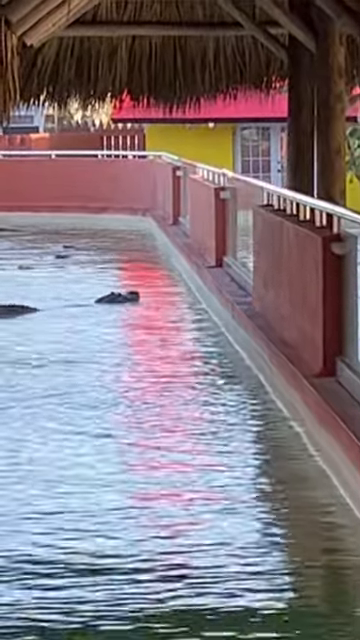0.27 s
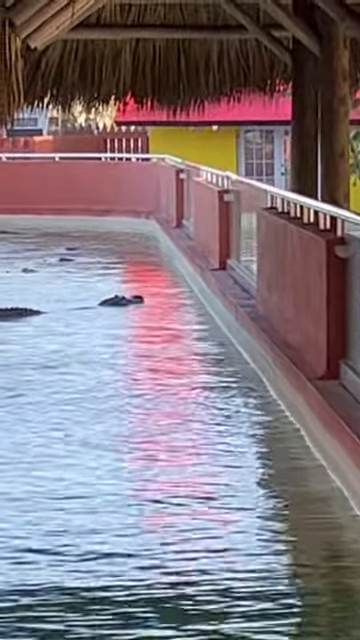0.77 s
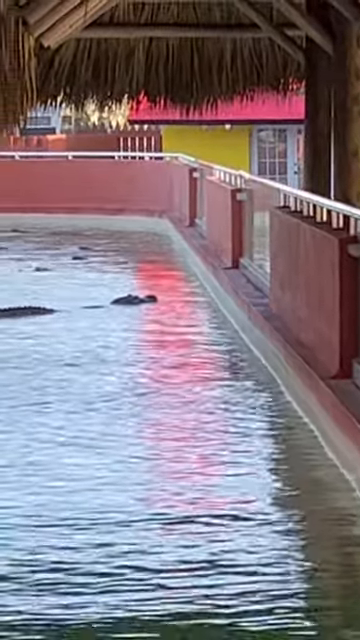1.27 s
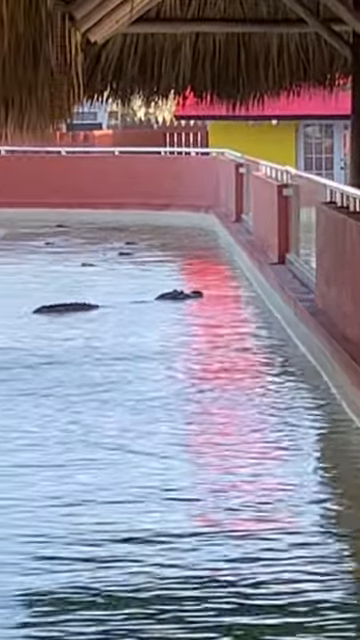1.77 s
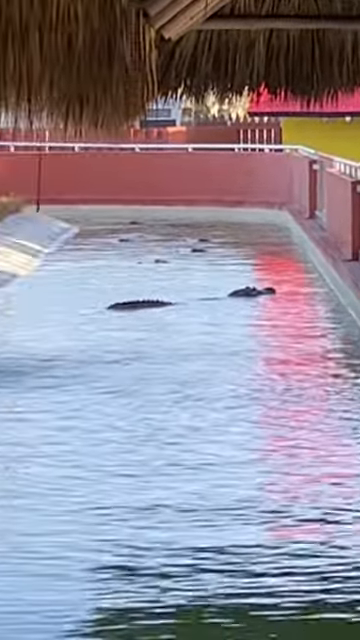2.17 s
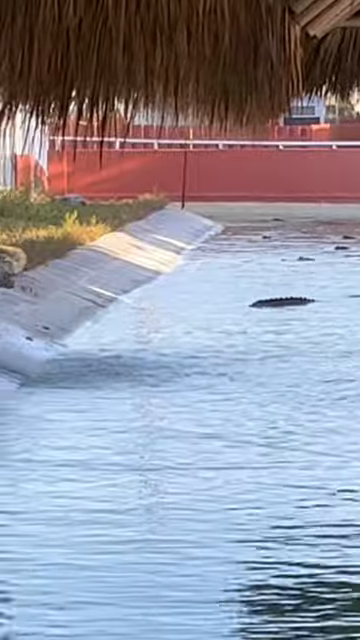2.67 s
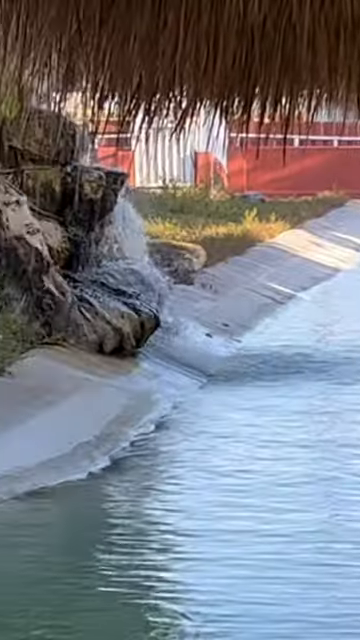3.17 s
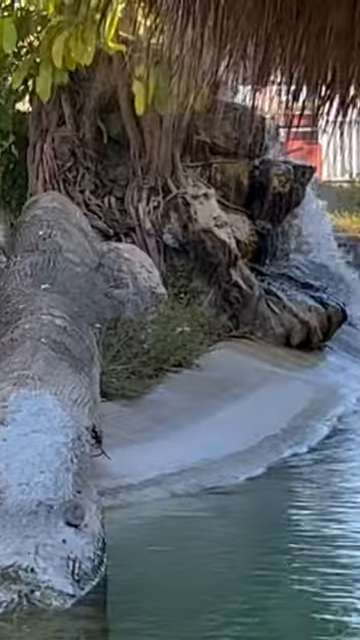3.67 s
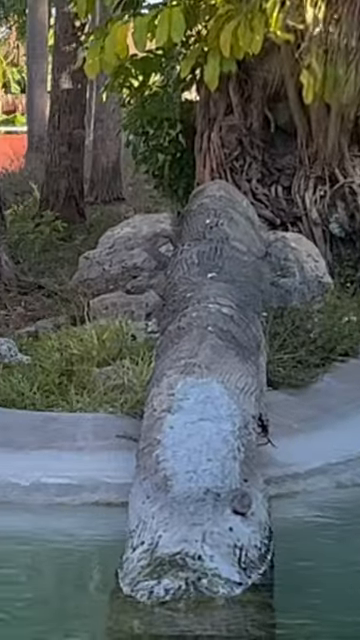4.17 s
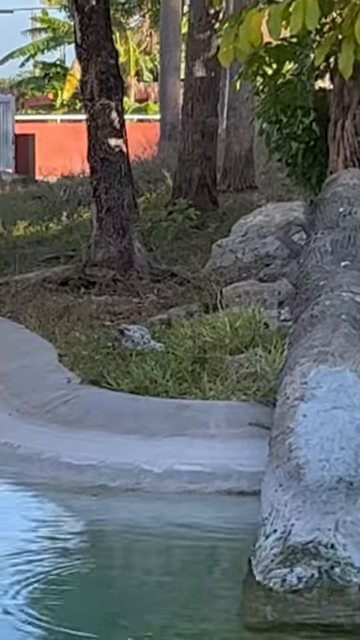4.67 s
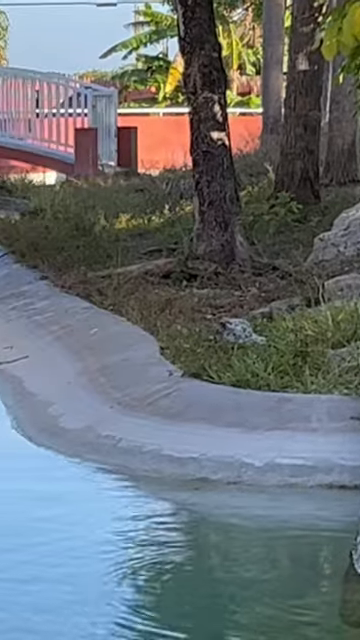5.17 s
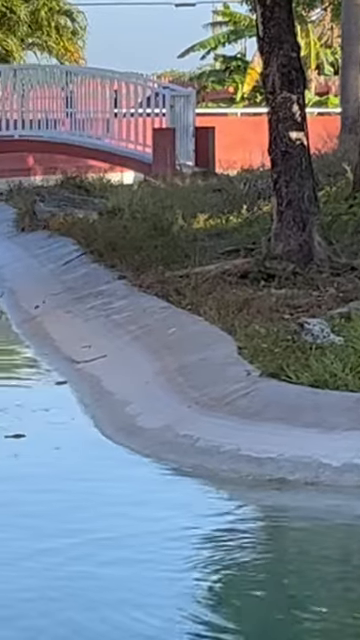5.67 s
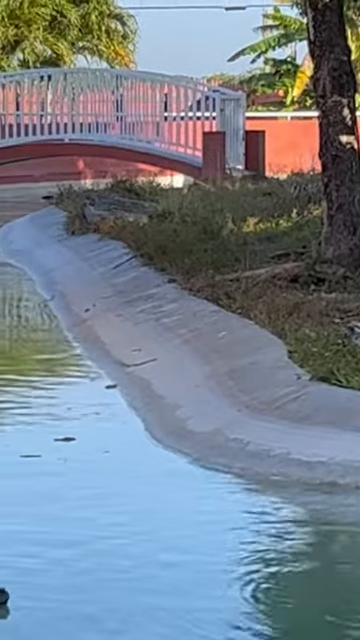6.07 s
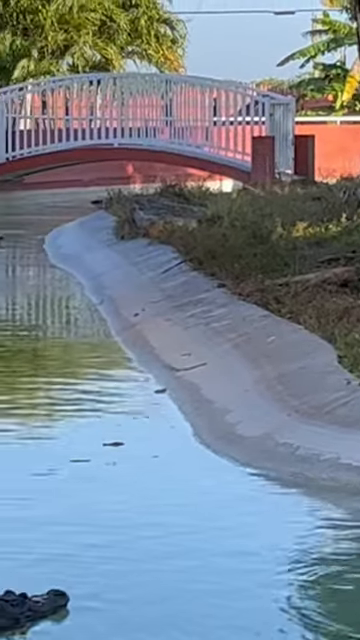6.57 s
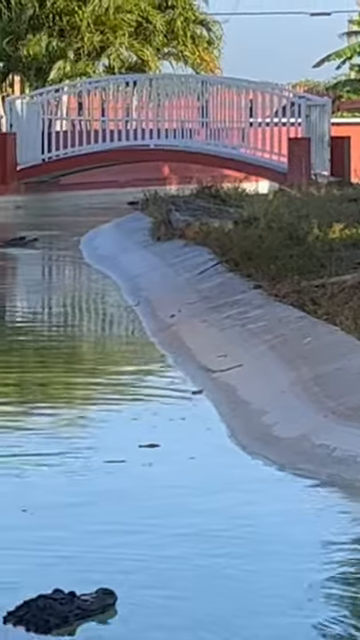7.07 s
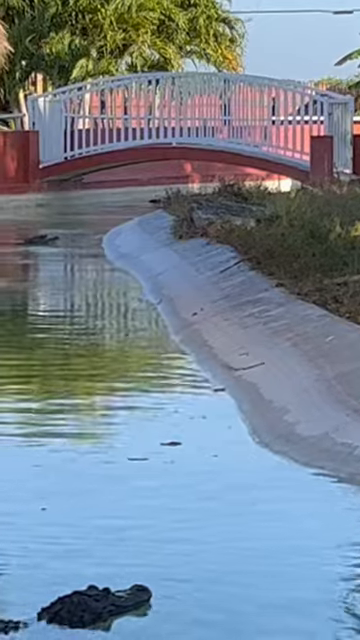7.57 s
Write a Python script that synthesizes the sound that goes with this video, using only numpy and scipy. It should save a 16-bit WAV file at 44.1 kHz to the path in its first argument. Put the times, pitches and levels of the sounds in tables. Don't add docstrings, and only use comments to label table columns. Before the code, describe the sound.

A small waterfall splashes and fizzes steadily in a walled reptile pool while one low alligator bellow sounds over a distant engine drone.

```python
import sys
import numpy as np
from scipy import signal
from scipy.fft import rfft, irfft, next_fast_len
from scipy.io import wavfile
from scipy.ndimage import uniform_filter1d, map_coordinates

SR = 44100
rng = np.random.default_rng(int(sys.argv[2]) if len(sys.argv) > 2 else 0)


def invert_db(x):
    u = np.asarray(x, float) / 20
    return 10 ** u


def transcribe(u):
    v = np.clip(np.atleast_2d(u).T, -1, 1)
    q = np.round(v * 32767).astype(np.int16)
    wavfile.write(sys.argv[1], SR, q)


N = 345303


def unit(x):
    return x / np.sqrt(np.mean(np.abs(x) ** 2) + 1e-20)


def along(points, hz, axis=1):
    rows = np.transpose(points)
    return np.interp(np.log(hz + 1), np.log(rows[0] + 1), rows[axis])


def curves(rows):
    s, *cols = np.transpose(rows)
    return [np.interp(np.arange(N) / SR, s, c) for c in cols]


def wobble(rate):
    return map_coordinates(rng.standard_normal(N // 200), [np.arange(N) * rate / SR])


def held(start, length, rise, fall):
    t = np.arange(N) / SR - start
    return np.minimum(0, np.minimum(rise * t, fall * (length - t)))


def bumps(rows):
    t = np.arange(N) / SR
    return sum(db * np.exp(-((t - s) / half) ** 2) for s, half, db in rows)


def filtered(x, response):
    m = next_fast_len(N + 8192)
    return irfft(rfft(x, m) * response(np.fft.rfftfreq(m, 1 / SR)), m)[..., :N]


def tone(hz, rough, rate):
    noise = wobble(rate) + 1j * wobble(rate)
    sway = np.sqrt(1 - rough) + np.sqrt(rough / 2) * noise
    turns = np.cumsum(hz) / SR + rng.random()
    return np.sqrt(2) * np.imag(sway * np.exp(2j * np.pi * turns))


def rush(spectrum, patchy_db):
    z = signal.stft(rng.standard_normal((2, N)), nperseg=512)[2]
    field = uniform_filter1d(rng.standard_normal(z.shape[1:]), size=8, axis=0)
    field = uniform_filter1d(field, size=5, axis=1)
    pair = signal.istft(z * invert_db(patchy_db * unit(field)), nperseg=512)[1][:, :N]
    closed = [(spectrum[0][0] * 0.52, -120), *spectrum, (spectrum[-1][0] * 2.0, -120)]
    return unit(filtered(pair, lambda hz: invert_db(along(closed, hz))))


def bubbles(s, db, hz, cycles, rise, size):
    u = np.arange(size) / SR * hz[:, None]
    swing = np.sin(2 * np.pi * u * (1 + rise * u / cycles))
    envelope = np.exp(-u / cycles) * (1 - np.exp(-2 * u))
    rings = invert_db(db)[:, None] * swing * envelope
    at = np.round(s * SR).astype(int)[:, None] + np.arange(size)
    return np.bincount(at.ravel(), rings.ravel(), N + size)[:N]


def swarm(count, low_hz, span, db, spread_db, cycles, size):
    when, pitch, luck = rng.random((3, 2, count))
    sizes_db = db - spread_db * np.log(luck + 0.02)
    return np.array([bubbles(when[k] * N / SR, sizes_db[k], low_hz * span ** pitch[k], cycles, 0.038, size)
                     for k in range(2)])


def waterfall():
    # (frequency [Hz], level [dB/Hz])
    spray = [(700, -23), (1000, -8.5), (1400, -4.5), (1650, -5), (2000, -2), (2250, -3), (2600, 2),
             (2800, -1.5), (3050, 1.5), (3500, -2), (3750, -1), (4100, -4.5), (5200, -7), (6500, -38)]
    # (frequency [Hz], level [dB/Hz])
    churn = [(150, -7), (250, -3.5), (450, -5.5), (700, -7), (1000, -12), (1300, -6.5)]
    # (frequency [Hz], level [dB/Hz])
    mist = [(4500, -8), (5600, -5), (7500, -7.5), (10000, -10.5), (13000, -15.5), (15800, -20)]
    # (time [s], half length [s], change [dB])
    washes = [
        (1.0, 0.089, -1),
        (2.45, 0.15, 1),
        (3.2, 0.17, 0),
        (4.45, 0.2, -0.3),
        (5.1, 0.13, 0),
        (6.8, 0.15, 1),
        (7.6, .15, 1),
    ]
    wash_db = bumps(washes)
    spray_db = -43.5 + wash_db + 0.3 * wobble(5)
    fading_db = -0.3042 * np.arange(N) / SR
    churn_db = -53.5 + 2 * wash_db + fading_db + 0.66 * wobble(5)
    surge = 0.3 * wobble(12) + 1.05 * wobble(36) + 0.6 * wobble(70)
    noise = invert_db(spray_db + 0.75 * surge) * rush(spray, patchy_db=1.3)
    noise += invert_db(churn_db + 1.8 + 0.3 * surge + 0.72 * wobble(12)) * rush(churn, patchy_db=2.0)
    noise += invert_db(spray_db - 4.5 + 0.57 * surge) * rush(mist, patchy_db=1.15)
    fizz = swarm(count=6000, low_hz=1247, span=3.56, db=-45, spread_db=3.0, cycles=3.06, size=320)
    gurgle = swarm(count=300, low_hz=275.0, span=2.6, db=-56.0, spread_db=2.5, cycles=10.7, size=2500)
    return noise + invert_db(1.66 * surge) * fizz + gurgle


def splashes():
    # (time [s], peak level [dB], ring frequency [Hz], crack relative level [dB])
    big_drops = [(0.293, -27, 2300, -16), (0.5227, -39, 2300, -13), (0.5571, -31, 2610, -15),
                 (1.2215, -17, 2880, -20), (1.2945, -20, 2730, -14), (1.963, -21, 2580, -22),
                 (2.0217, -24.5, 1160, -6.5), (2.4304, -21, 2610, -13), (2.4977, -20, 2510, -15),
                 (3.0298, -15.5, 2710, -22), (3.461, -22, 2570, -17), (3.7594, -33, 3230, -18),
                 (3.795, -22, 2400, -8), (4.0701, -23, 2450, -15), (4.133, -23, 2600, -22),
                 (4.9462, -18, 2730, -23), (4.9753, -28, 2350, -22), (5.4036, -16, 2530, -21.5),
                 (6.0043, -21, 2440, -14), (6.2272, -19, 2960, -18), (6.9132, -24, 2000, -10),
                 (7.365, -16.5, 2060, -24), (7.5065, -21, 3010, -20), (7.532, -18.5, 2690, -23),
                 (7.728, -22, 2100, -20)]
    s, db, hz, crack_db = np.transpose(big_drops)
    rings = bubbles(s, db - 5.0, hz, cycles=2.95, rise=0.033, size=1200)
    cracks = bubbles(s, db + crack_db + 11, 0 * s + 3800, cycles=1.5, rise=0.01, size=200)
    return rings + cracks


def drips():
    # (time [s], peak level [dB], frequency [Hz])
    soft_drops = [(0.25, -46, 1000), (2.024, -33, 1125), (2.3, -35, 1050), (2.9, -39, 1360),
                  (4.14, -32, 1700), (4.5, -42, 550), (5.9, -43, 445), (6.089, -43, 700),
                  (6.209, -41.5, 440), (5.8, -31, 1400), (6.869, -28.5, 1560), (6.7, -41, 2600),
                  (7.374, -25.5, 1500), (2.526, -42, 700), (2.083, -32, 3000), (7, -28, 2420),
                  (7.727, -28, 1850), (7.727, -25, 1380), (2.455, -41, 520), (2.8, -51, 390),
                  (2.022, -27.5, 5500), (7.753, -31, 1780), (7.768, -35, 1350), (7.553, -33, 1450),
                  (1.966, -33, 1800)]
    return bubbles(*np.transpose(soft_drops), cycles=7.3, rise=0.02, size=3000)


def bank_plops():
    # (time [s], peak level [dB], frequency [Hz])
    plops = [(0.145, -39.5, 440), (0.562, -40.5, 473), (0.61, -47, 334), (1.176, -48, 373),
             (2.454, -53, 323), (2.498, -39, 448), (2.526, -35, 544), (2.987, -44, 373), (3.404, -40, 500),
             (3.972, -44, 519), (4.702, -43, 470), (4.993, -37, 316), (5.254, -35, 323), (5.801, -47, 435),
             (6.915, -38, 444)]
    s, db, hz = np.transpose(plops)
    return bubbles(s, db + 2.0, hz, cycles=3.5, rise=0.0064, size=3000)


def engine():
    # (time [s], frequency [Hz])
    speed = [
        (0, 24.5),
        (2, 24.3),
        (4.5, 24.1),
        (5, 23.85),
        (6.55, 23.5),
        (6.85, 21.4),
        (7.1, 20.2),
        (7.83, 19.6),
    ]
    # (time [s], level of the steady high orders [dB], share of the way round the wall [0-1])
    path = [(0, -6.5, 0.02), (.6, -4.5, 0.03), (1.1, -0.5, 0), (2.6, -.5, .08), (3.95, -2, .15),
            (4.5, 2, 0.3), (4.95, -1, 0.74), (5.75, -2, 0.77), (6.45, 0.5, 1), (6.8, -6, 1), (7.2, 1, 0.94),
            (7.83, -0.5, 0.88)]
    # (multiple, level on the open path [dB], level round the wall [dB])
    low_orders = [(3, -53.5, -49), (4, -54.5, -53)]
    # (multiple, level on the open path [dB], level round the wall [dB])
    high_orders = [(5, -57, -48), (6, -44.5, -56.5), (7, -55, -67), (8, -58.5, -54), (9, -59.5, -56),
                   (10, -68, -64)]
    # (time [s], half length [s], dip [dB])
    dips = [
        (4.12, 0.047, -14),
        (4.7, 0.17, -8),
        (6.95, 0.088, -13),
    ]
    hz = curves(speed)[0]
    loud_db, turn = curves(path)
    slowing = np.maximum(23.5 - hz, 0)

    def order(row, rough):
        k, open_db, round_db = row
        dull_db = -1.5 * slowing * max(k - 5, 0) / 2
        level_db = open_db + (round_db - open_db) * turn + dull_db
        return invert_db(level_db) * tone(k * hz, rough, rate=12)

    uneven = sum(order(row, rough=0.5) for row in low_orders)
    even = sum(order(row, rough=0.045) for row in high_orders)
    return invert_db(bumps(dips)) * (uneven + invert_db(loud_db) * even)


def alligator():
    # (multiple of the fold rate, level [dB], roughness [0-1])
    throat = [(1, -0.5, 0.05), (1.5, -10, 0.6), (2, 1, 0.05), (2.5, -13, 0.8), (3, -19, 0.5), (4, -25, 0.6)]
    from_top = np.arange(N) / SR - 1.125
    hz = np.maximum(80.6 - 74 * from_top ** 2, 60)
    effort_db = -44 + held(0.81, 0.59, rise=262, fall=170)
    partials = sum(invert_db(db) * tone(k * hz, np.clip(rough, 0, 1), rate=18) for k, db, rough in throat)
    return invert_db(effort_db) * partials


def bird():
    # (time [s], length [s], start frequency [Hz], end frequency [Hz], level [dB], lateness of the fall)
    chips = [
        (6.583, 0.061, 4070, 2450, -35, 1.5),
        (7.322, .054, 4520, 3020, -42.5, .95),
    ]
    out = np.zeros(N)
    for s, length, from_hz, to_hz, db, bend in chips:
        u = np.linspace(0, 1, round(length * SR))
        hz = from_hz + (to_hz - from_hz) * u ** bend
        flutter = 1 + 0.35 * np.sin(2 * np.pi * 90 * u * length)
        whistle = np.sin(2 * np.pi * np.cumsum(hz) / SR)
        out[round(s * SR):][:len(u)] += invert_db(db) * flutter * np.sin(np.pi * u) ** 0.45 * whistle
    echoes = [(0.004, -4), (0.011, -12), (0.027, -13)]  # (delay [s], level [dB])
    return out + sum(invert_db(db) * np.roll(out, round(late * SR)) for late, db in echoes)


def pump():
    return invert_db(-49.5) * tone(np.full(N, 58.65), rough=0.027, rate=5)


def pool_knocks():
    # (time [s], peak level [dB], frequency [Hz])
    booms = [
        (2.43, -36, 66.4),
        (3.42, -35, 67),
        (4.39, -30.5, 68.4),
        (5.36, -36, 72.6),
        (6.21, -38, 60),
        (6.86, -37, 57),
    ]
    return bubbles(*np.transpose(booms), cycles=2.7, rise=0.017, size=12000)


def far_growls():
    # (start [s], length [s], throat resonance [Hz], level [dB])
    growls = [
        (4.97, 0.315, 322, -57),
        (5.82, 0.47, 462, -60.5),
    ]
    return sum(invert_db(db + held(s, length, 200, 200)) * tone(np.full(N, hz), rough=0.78, rate=39)
               for s, length, hz, db in growls)


def rumble():
    # (frequency [Hz], level [dB/Hz])
    grumble = [(18, -36), (26, -19), (33, -17), (40, -20), (48, -4.5), (62, -6), (75, 0), (105, -3.5),
               (130, -8.5), (165, -11.5), (205, -10.5), (263, -19.5), (330, -14.5)]
    # (time [s], level over the grumbling [dB])
    thuds = [(.44, 2), (1.07, 4), (1.42, 7), (2.33, 3), (3.45, 5), (3.64, 6.5), (4.06, 6), (4.42, 5),
             (4.65, 6.5), (5.35, 5), (5.56, 2), (6.102, 5), (6.52, 4), (6.9, 5.5)]
    swell_db = bumps([(s, 0.073, db) for s, db in thuds])
    return invert_db(-49.5 + swell_db) * rush(grumble, patchy_db=0.8)


def scene():
    drone = alligator() + far_growls() + engine()
    near = splashes() + drips() + bank_plops() + bird()
    direct = drone + near + pump() + pool_knocks()
    late = np.roll(drone, round(0.013 * SR)) + invert_db(-9) * np.roll(near, round(0.006 * SR))
    return waterfall() + rumble() + np.array([direct, late])


def ports(field):
    # (frequency [Hz], likeness [0-1], left minus right [dB], lead of the left [rad])
    port_pair = [(40, .99, -0.5, 0), (90, 1, 0.2, 0.3), (170, 0.95, -1.7, 0.35), (432, 0.92, -0.5, -0.05),
                 (750, 0.87, -5, 1.04), (950, 0.3, -1.5, 1.4), (1260, 0.17, -2, 1.5), (1327, 0.58, -12, 4),
                 (1586, 0.49, -2.5, 4), (1836, 0.58, -4.5, -0.5), (2400, 0.96, -1.5, 0.28),
                 (3300, .97, 0, .12), (4900, .97, 0, -.3), (5300, .93, 0, -.62), (6500, .92, 0, -1),
                 (7400, .92, 0, -1.9), (8450, .93, 0, -np.pi), (12050, .93, 0, -2 * np.pi),
                 (15300, .93, 0, -3 * np.pi)]
    rows = port_pair

    def mixing(hz):
        turn = np.arccos(np.clip(along(rows, hz), 0, 1)) / 2
        return np.array([np.cos(turn), np.sin(turn)])

    def tilt(hz):
        return invert_db(along(rows, hz, axis=2) / 2) * np.exp(0.5j * along(rows, hz, axis=3))

    same, other = filtered(field, mixing)
    pair = np.array([same + other, same - other])
    return filtered(pair, lambda hz: np.array([tilt(hz), 1 / tilt(hz)]))


def joint_stereo(left, right):
    # (frequency [Hz], level against the stronger [dB])
    survival = [(2400, -20), (3100, -17.5), (3800, -12), (5200, -11.5), (7600, -8), (9000, -9.3),
                (10300, -6), (11000, -6.5), (13100, -5), (13800, -7), (14500, -6)]
    band_edges = [112, 128, 144, 160, 176, 196, 216, 240, 264, 292, *range(320, 768, 32)]
    hz, t, z = signal.stft([left + right, left - right], SR, window="cosine", nperseg=2048)
    for lo, hi in zip(band_edges, band_edges[1:]):
        power = np.mean(np.abs(z[:, lo:hi]) ** 2, axis=1)
        power = uniform_filter1d(power, size=2, axis=1)
        short_db = 3.4 * uniform_filter1d(rng.standard_normal(len(t)), size=3) ** 2
        threshold_db = along(survival, hz[lo]) + short_db
        z[:, lo:hi] *= (power > power[::-1] * invert_db(2 * threshold_db))[:, None]
    mid, side = signal.istft(z, SR, window="cosine", nperseg=2048)[1][:, :N] / 2
    return np.array([mid + side, mid - side])


def low_pass(x):
    return signal.sosfilt(signal.butter(12, 15850, fs=SR, output="sos"), x)


def record(dry):
    left, right = ports(dry)
    return low_pass(joint_stereo(left, right))


dry = scene()
out = record(dry)
transcribe(out)
```